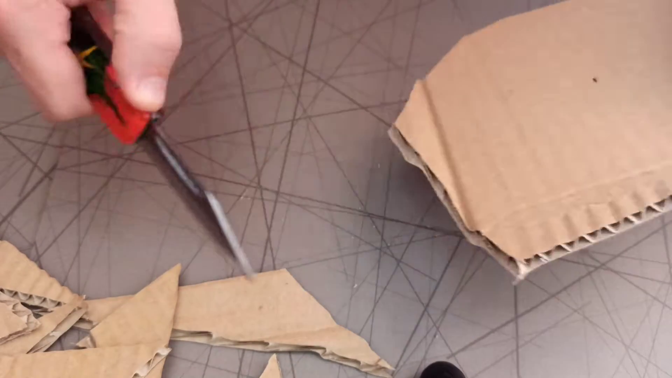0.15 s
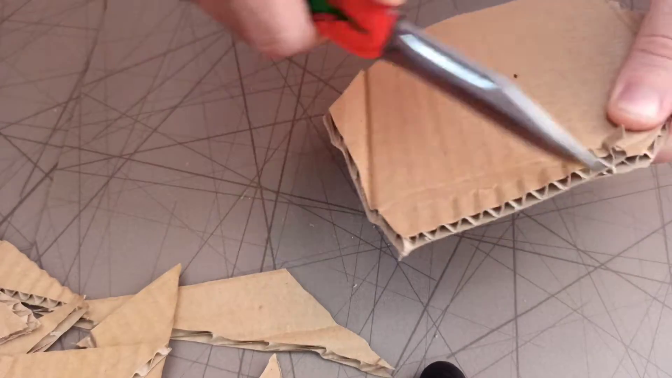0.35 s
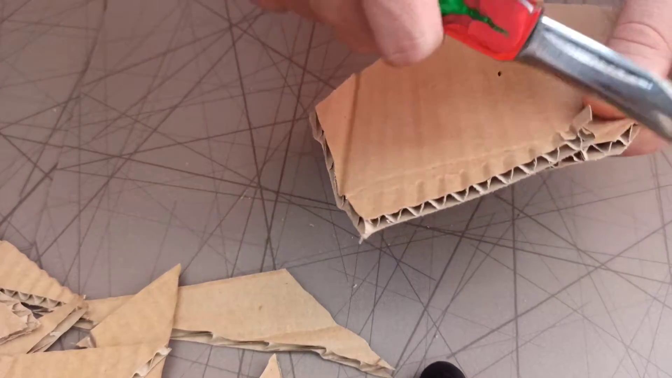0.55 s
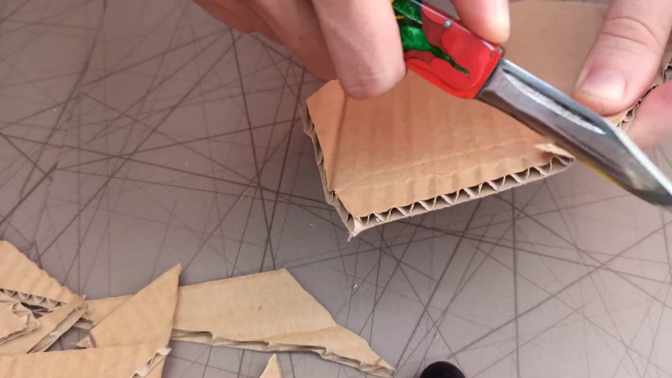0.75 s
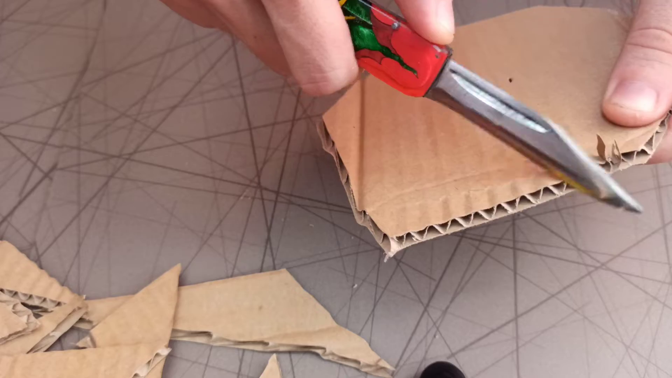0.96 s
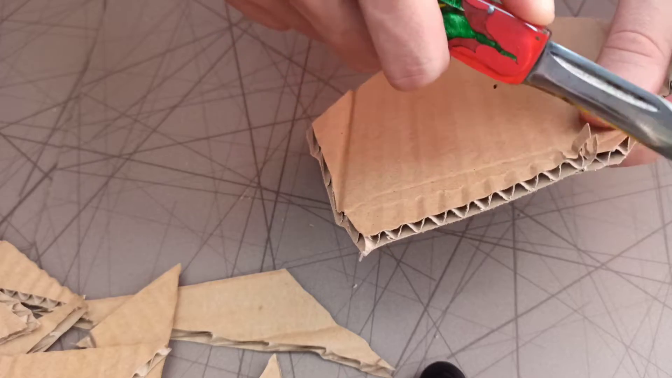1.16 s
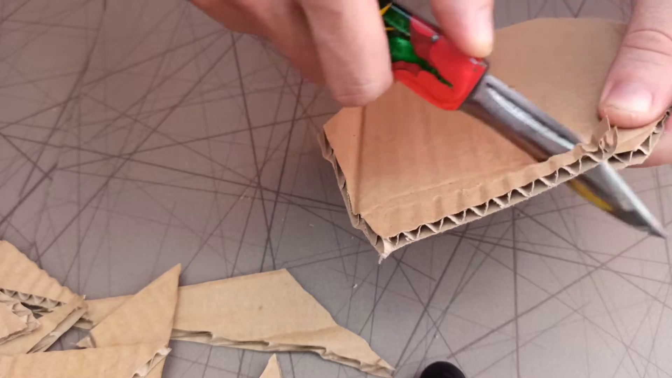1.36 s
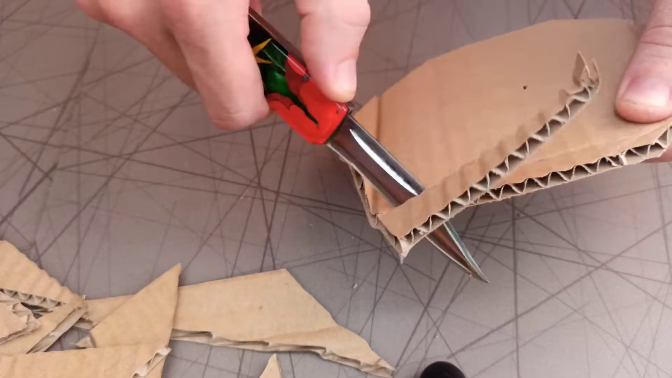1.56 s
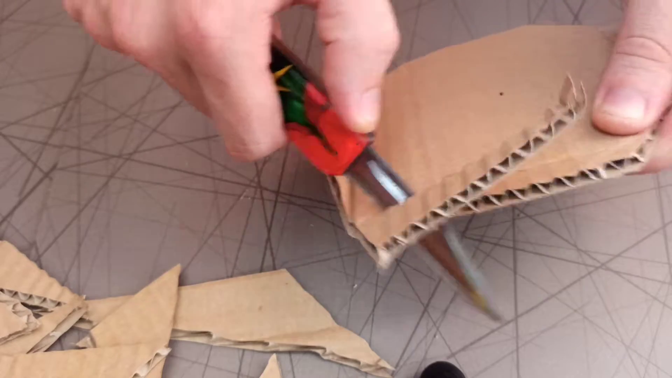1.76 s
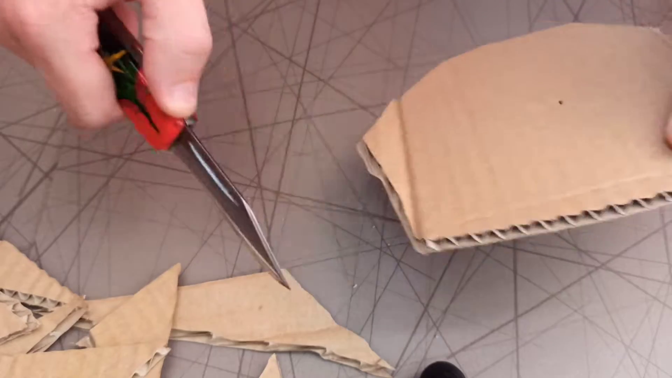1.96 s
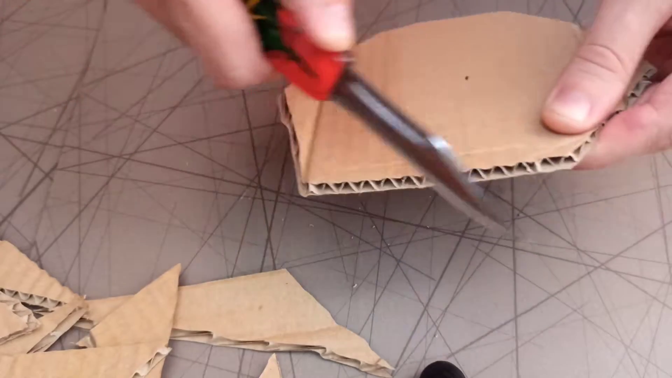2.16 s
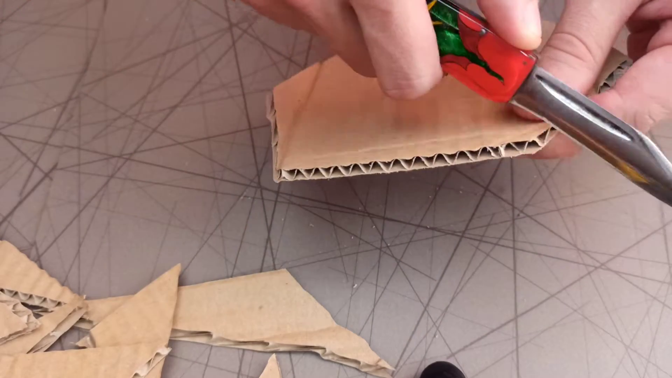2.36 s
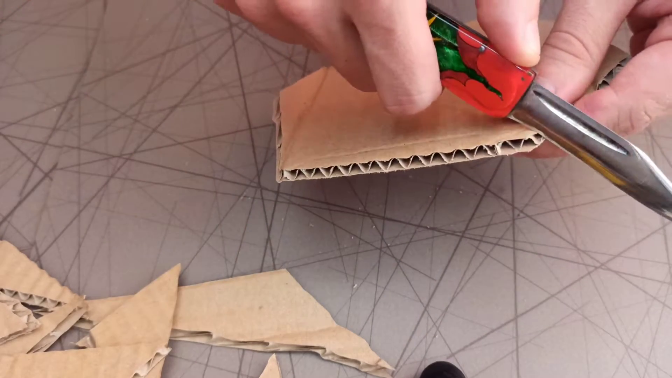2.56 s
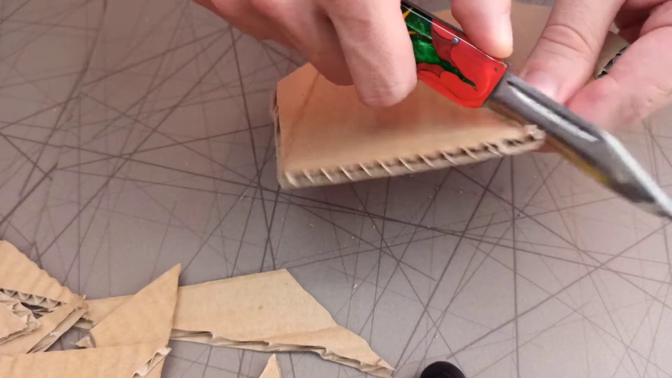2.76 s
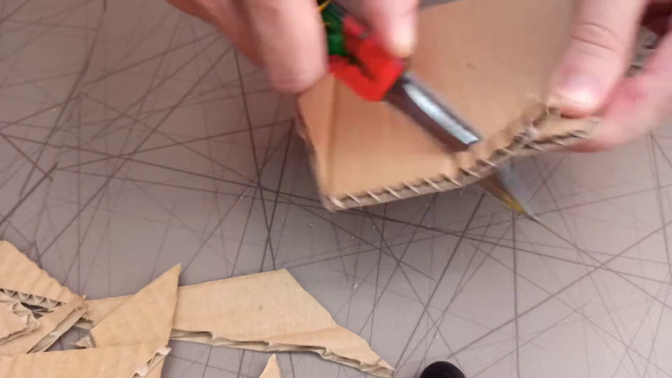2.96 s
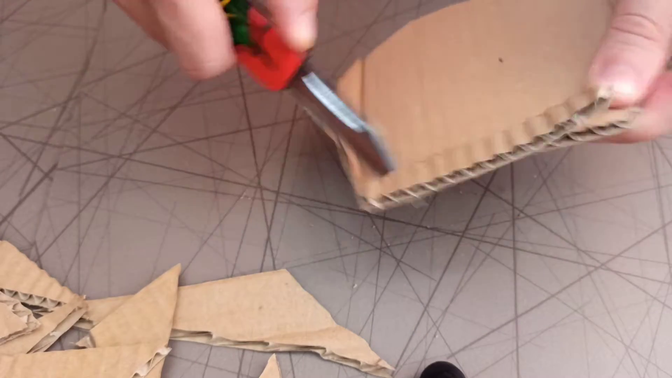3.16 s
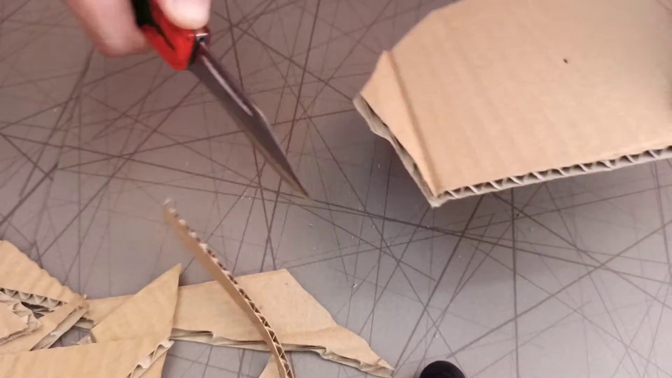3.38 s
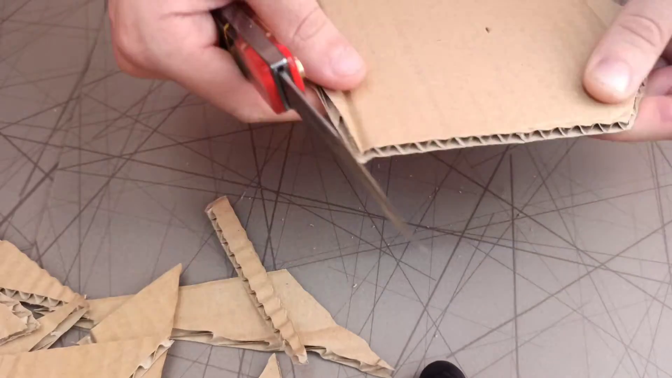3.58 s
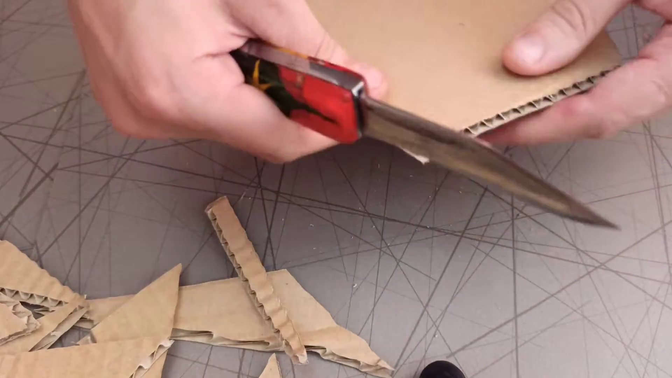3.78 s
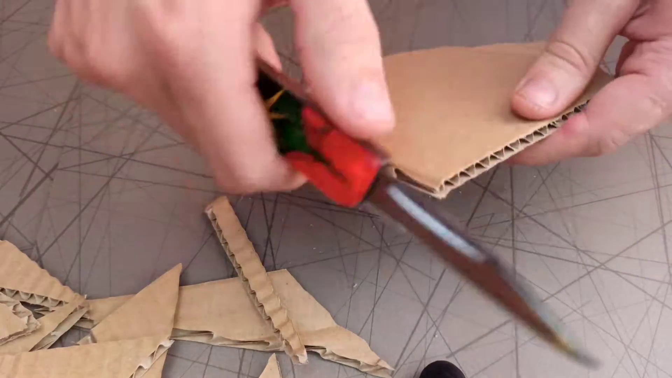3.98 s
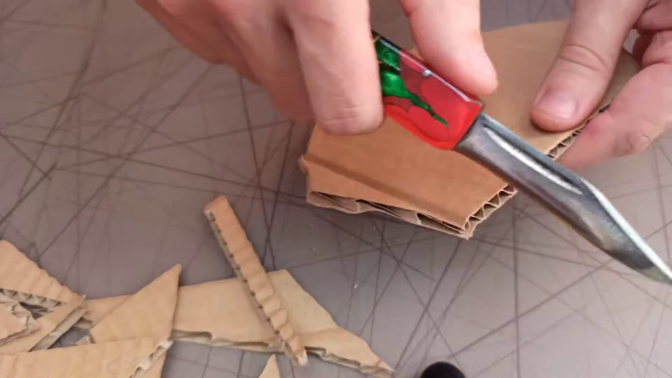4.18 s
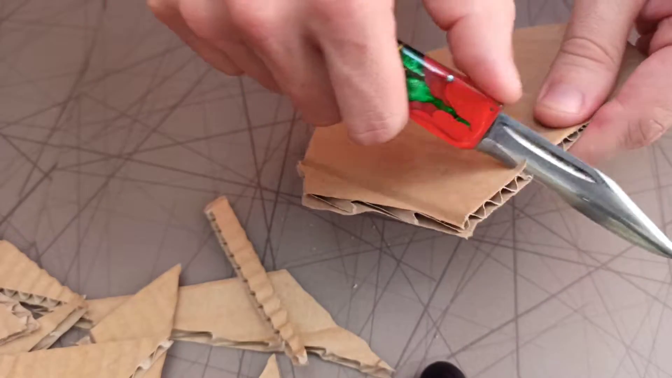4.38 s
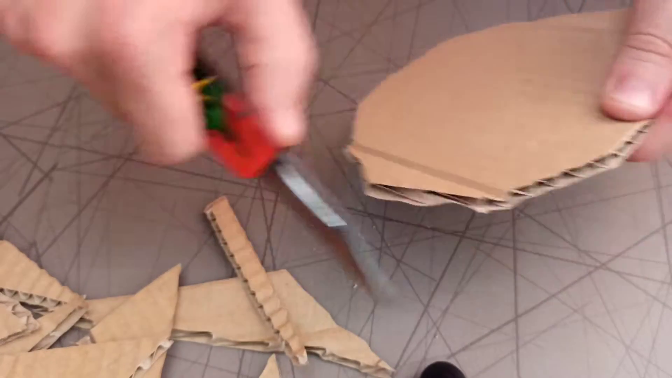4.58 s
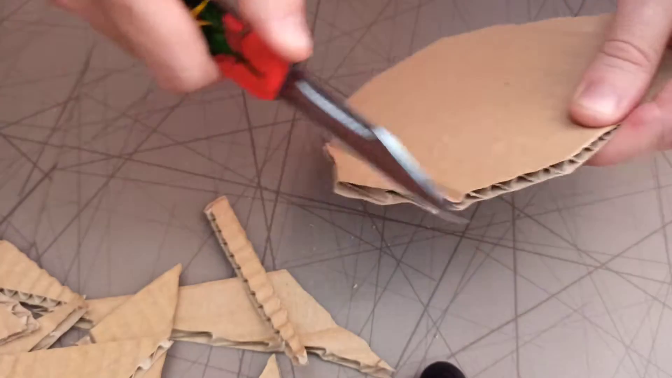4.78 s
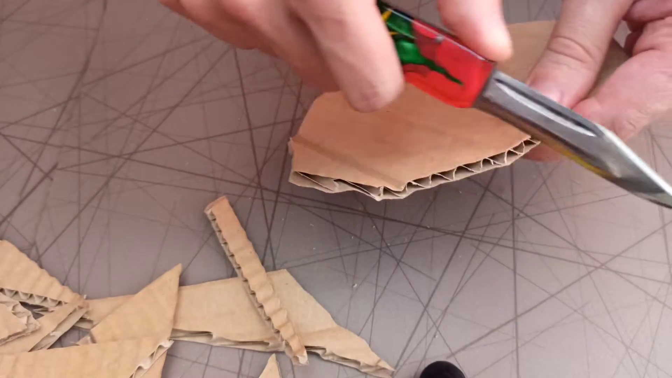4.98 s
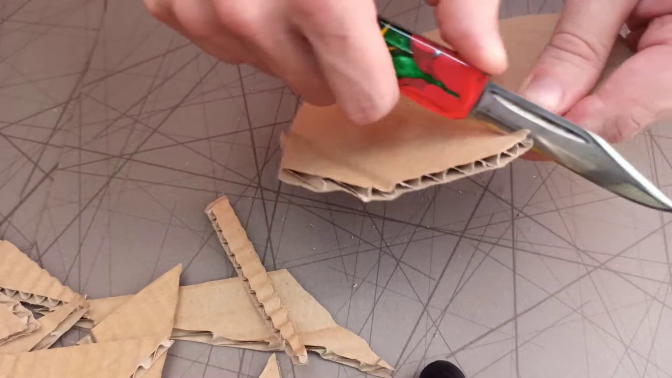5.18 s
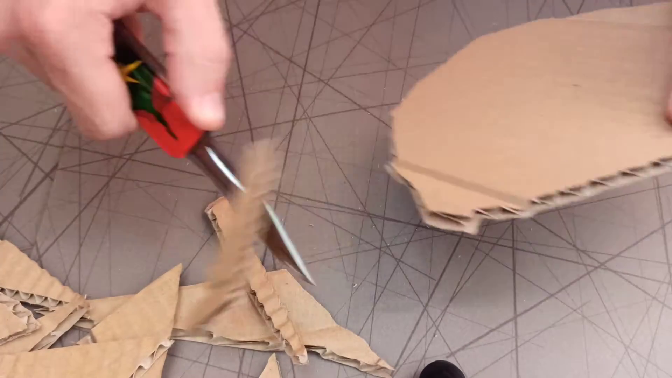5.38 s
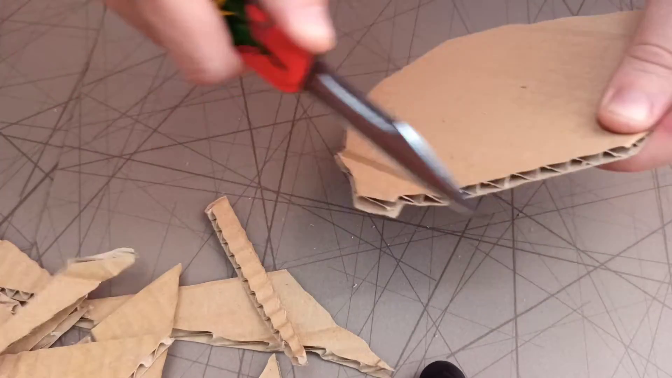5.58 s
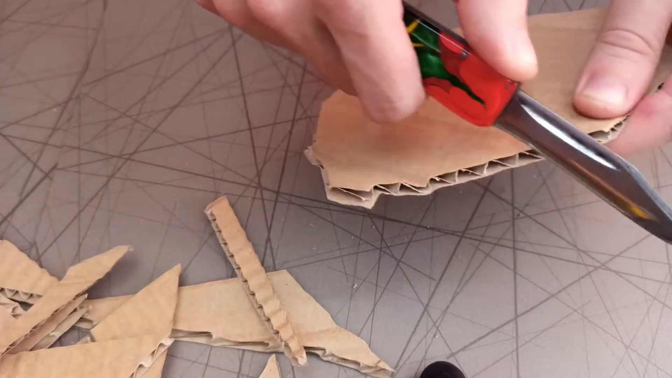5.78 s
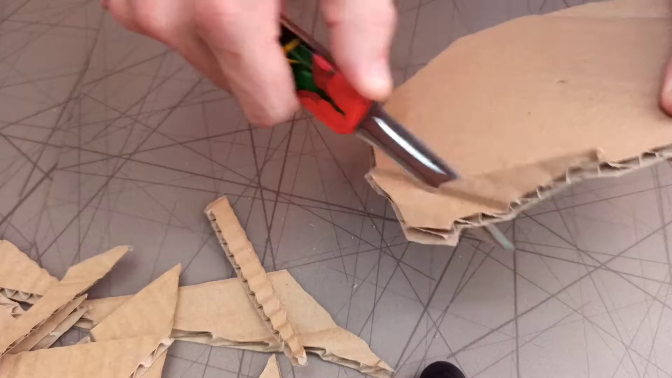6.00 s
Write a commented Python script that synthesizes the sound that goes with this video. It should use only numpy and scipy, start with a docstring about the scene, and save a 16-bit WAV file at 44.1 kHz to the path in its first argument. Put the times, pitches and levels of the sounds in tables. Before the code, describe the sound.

A knife rips through corrugated cardboard in short, dry, raspy strokes with crisp cracks and dull knocks, close by in a small quiet room.

```python
"""Knife through corrugated cardboard

A knife is pushed through the board in short strokes, heard close by.
Tearing is noise in clumps, one per bundle of fibres; snapping flutes are short ringing cracks.
Cuts, rubs and knocks also drive the short modes of the board, which answers dully.
Behind lie the sparse echoes of a small room, rumble and hiss, and a faint hum of two thin tones."""
import sys
import numpy as np
from scipy import signal
from scipy.io import wavfile
from scipy.ndimage import uniform_filter1d

SR = 44100
rng = np.random.default_rng(int(sys.argv[2]) if len(sys.argv) > 2 else 0)


def invert_db(x):
    """Field ratio 10**(x/20) for x, a level in decibels (scalar or array-like)."""
    u = np.asarray(x, float) / 20
    return 10 ** u


def pcm_store(signal):
    """Save signal as 16-bit PCM."""
    levels = np.round(np.clip(np.atleast_2d(signal), -1, 1) * 32767)
    wavfile.write(sys.argv[1], SR, levels.astype(np.int16).T)


N = 266364  # length in samples


def evened(x):
    """Scales to an rms of one."""
    return x / np.sqrt(np.mean(x ** 2) + 1e-20)


def read_curve(points, hz):
    """Reads a table over frequency on a log-frequency axis."""
    table_hz, value = np.transpose(points)
    return np.interp(np.log(hz + 1), np.log(table_hz + 1), value)


def coloured(x, points):
    """Causal filter with the given spectrum: the phase follows from the log gain."""
    hz = abs(np.fft.fftfreq(8192, 1 / SR))
    log_gain = np.log(invert_db(read_curve(points, hz)))
    minimum_phase = np.exp(np.conj(signal.hilbert(log_gain)))
    taps = np.fft.ifft(minimum_phase).real[:4096]
    return signal.oaconvolve(x, taps)[:N]


# spectrum of the room air, relative: (pitch_hz, level_db)
AIR_COLOUR = [(50, 3.5), (110, 7), (250, -2.5), (600, -10), (1200, -18), (2200, -27.5), (5000, -34),
              (16000, -37.5)]
AIR_DB = -58.5  # rms level of the air ahead of the overall tone
# two thin hum tones: (level_db, waver_width_hz)
HUM_TONES = [(-70, 3.4), (-90.5, 20)]
# their pitches: (pitch_hz)
HUM_PITCHES = [623, 4362]


def air():
    """Low rumble and hiss as coloured noise, with two thin tones that waver slightly."""
    t = np.arange(N) / SR
    out = invert_db(AIR_DB) * evened(coloured(rng.standard_normal(N), AIR_COLOUR))
    for pitch_hz, (level_db, width_hz) in zip(HUM_PITCHES, HUM_TONES):
        keep = np.exp(-np.pi * width_hz / SR)
        noise = rng.standard_normal(N) + 1j * rng.standard_normal(N)
        drift = signal.lfilter([1], [1, -keep], noise)
        waver = 1 + 0.15 * drift / abs(drift).std()
        tone = (waver * np.exp(2j * np.pi * pitch_hz * t)).real
        out += invert_db(level_db) * evened(tone)
    return out


# how fast the echoes die by 60 dB: (pitch_hz, t60_s)
ROOM_DECAY = [(200, 0.21), (600, 0.19), (1500, 0.2), (4000, 0.2), (10000, 0.2)]


def room(x):
    """Sparse echoes of random sign, each band dying at its own speed."""
    taps = np.zeros(SR // 2)
    at = np.arange(120, len(taps) - 20, 20)  # one echo at random in each 20 samples
    taps[at + rng.integers(0, 20, len(at))] = rng.choice([-1., 1.], len(at))
    hz, t, z = signal.stft(taps, SR, nperseg=256)
    decay = invert_db(-60 * t / read_curve(ROOM_DECAY, hz)[:, None])
    tail = signal.istft(z * decay, SR, nperseg=256)[1]
    return signal.fftconvolve(x, tail / np.linalg.norm(tail))[:N]


# ringing modes of the cardboard, levels relative: (pitch_hz, width_hz, level_db)
BOARD_MODES = [(406, 30, 0), (467, 40, 2), (620, 19, 0.5), (709, 110, 7.5), (988, 84, 2), (1185, 130, 2),
               (1378, 200, 2), (1600, 68, -9.5), (2120, 89, -5.5)]


def board(force):
    """Every push on the cardboard rings the same short modes; a thin sheet radiates little bass."""
    t = np.arange(SR // 8) / SR
    ring = np.zeros(len(t))
    for pitch_hz, width_hz, level_db in BOARD_MODES:
        decay = np.sqrt(width_hz) * np.exp(-np.pi * width_hz * t)
        ring += invert_db(level_db) * decay * np.sin(2 * np.pi * pitch_hz * t)
    thin_sheet = signal.butter(3, 300., "high", fs=SR, output="sos")
    ring = signal.sosfilt(thin_sheet, ring)
    return signal.oaconvolve(force, ring / np.linalg.norm(ring))[:N]


# blows on the board, levels relative: (start_s, level_db, pitch_hz, cycles)
BLOWS = [(.0455, -12.5, 650, 4.2), (.046, -18, 379, 8.1), (.058, -23.5, 624, 3.7), (.603, -43.5, 463, 3.3),
         (0.714, -30, 1220, 6.3), (.759, -15.5, 700, 3.2), (0.776, -20, 970, 2.2), (.824, -25, 540, 5.3),
         (.98, -40, 1400, 3), (.987, -32, 756, 3.3), (1.055, -35, 1300, 1.7), (1.055, -29, 485, 7.5),
         (1.305, -51, 704, 4.4), (1.39, -48, 750, 4.4), (1.412, -42, 446, 8.1), (1.43, -35.5, 484, 5),
         (1.453, -40.5, 434, 8), (1.602, -35, 1520, 3.8), (1.626, -28, 510, 1.7), (1.632, -34.5, 430, 7.8),
         (1.657, -28.5, 1020, 2.5), (1.708, -43, 1000, 2), (1.736, -34, 440, 6.8), (1.765, -27.5, 450, 2),
         (1.811, -36, 580, 5), (1.932, -33, 740, 1.25), (2.645, -40, 573, 9.8), (2.788, -26.5, 690, 3.5),
         (2.941, -14.5, 1190, 5.2), (3.111, -29, 510, 2), (3.143, -17.5, 625, 2.4), (3.166, -18, 620, 2.1),
         (3.352, -30.5, 1700, 2.4), (3.516, -37.5, 443, 4), (3.822, -23.5, 785, 4.9),
         (3.86, -36, 990, 12.4), (4.032, -20.5, 620, 1.6), (4.039, -25, 217, 4.4), (4.072, -28, 1500, 2),
         (4.381, -32.5, 1370, 11.8), (4.513, -24.5, 430, 7.3), (4.538, -24.5, 656, 2.5),
         (5.303, -10, 600, 3), (5.376, -39, 794, 4.3), (5.814, -32.5, 737, 8.7), (5.816, -28.5, 1530, 12),
         (5.91, -22, 1340, 2.6), (5.946, -24, 730, 7.2), (5.973, -18, 1080, 4.2)]


def knocks():
    """A push of a few cycles, heard directly and through the ringing board."""
    push = np.zeros(N + 2000)
    for start_s, level_db, pitch_hz, cycles in BLOWS:
        u = np.arange(0, 1, pitch_hz / (np.clip(cycles, 1, 12) * SR))  # 0 to 1 along the push
        early_peak = np.sin(np.pi * u ** 0.3) ** 2
        push[round(start_s * SR):][:len(u)] += invert_db(level_db) * np.sin(2 * np.pi * cycles * u) * early_peak
    return invert_db(-7.0) * push[:N] + invert_db(-23.0) * board(push)


# spectrum of tearing fibres ahead of the overall tone: (pitch_hz, level_db)
FIBRE_COLOUR = [(150, -30), (500, 1), (1500, -3.5), (3000, -5.5), (7000, -1.5), (16000, -1.5)]


def fibre_colour(x):
    """Gives noise the spectrum of tearing cardboard fibres."""
    return coloured(x, FIBRE_COLOUR)


# flutes snapping, blade and scraps ticking; level relative, ring against the crack:
# (start_s, level_db, ring_hz, ring_db, length_ms)
CRACKS = [(0.0251, -14, 4070, 10, 1.5), (0.0456, -9.5, 1600, 14, 3), (0.602, -51, 1600, 5, 1.7),
          (0.711, -30, 1500, 25, 0.87), (0.726, -38, 2930, 23, 1.7), (0.739, -27, 1500, 5, 1.7),
          (0.7593, -18.5, 1600, 20.5, 2.9), (0.7734, -29, 4300, 22, 2.5), (0.8244, -29, 3590, 13, 2.3),
          (0.979, -38, 1590, 5, 1.9), (1.0027, -37.5, 2630, 13, 2.1), (1.0332, -42, 2290, 26, 2.1),
          (1.0565, -31, 1600, 5, 1.3), (1.569, -32.5, 4150, -11, 1.9), (1.6247, -43, 2210, 2.5, 1),
          (1.7792, -30, 3570, 10, 0.99), (1.7848, -20.5, 4700, -5.5, 2), (1.932, -37.5, 3540, 20.5, 4),
          (1.9485, -31.5, 3470, 21, 1.4), (2.007, -48, 3300, 5, 1.7), (2.0444, -40, 2060, 3, 1.7),
          (2.1102, -19.5, 3700, 10, 1.46), (2.4094, -44, 2100, 2, 1.1), (2.6453, -21.5, 4770, 17, 0.73),
          (2.741, -15.5, 4300, -13, 2.3), (2.768, -17, 4300, 12, 2.1), (2.7874, -12, 4730, 14.5, 1.8),
          (2.9111, -6.5, 4340, 3, 1.3), (2.9404, -9, 4660, 10.5, 1.2), (2.9507, -2.5, 4100, 6, 2.1),
          (3.1091, -6, 4340, -3, 2.8), (3.1354, -5.5, 2140, 4, 5.1), (3.1446, -5, 2090, 7, 3.7),
          (3.1564, -4, 2190, 5, 0.66), (3.1695, -11, 1880, 7, 0.68), (3.3069, -37, 1590, -1, 2.3),
          (3.3438, -24.5, 4000, 11.5, 3), (3.3509, -30.5, 4500, 17, 2.4), (3.406, -38, 3960, 14, 3.2),
          (3.4725, -33, 4030, 1, 1.7), (3.512, -40, 1650, 8, 1.9), (3.5592, -31.5, 4680, 5, 2.8),
          (3.5795, -39.5, 4260, 5, 2.1), (3.776, -36, 3400, 4, 5), (3.822, -26.5, 4250, 9, 3.6),
          (3.9494, -36, 4540, 6, 2.4), (4.0334, -10, 3900, 14.5, 2.35), (4.071, -33.5, 4060, 24.5, 1.3),
          (4.2972, -39.5, 1720, 15, 1.7), (4.3839, -23, 4130, 2.5, 1.7), (4.4795, -15.5, 3220, -3, 1.7),
          (4.5082, -5, 1530, 8, 1.5), (4.5388, -5.5, 3920, 5, 4.4), (4.5982, -19.5, 3900, 1.5, 2.9),
          (4.695, -34.5, 3930, -5, 1.5), (4.8336, -25, 2400, 0, 0.97), (4.8427, -29, 2360, 17.5, 2.5),
          (4.8743, -26.5, 3400, 6, 1.7), (4.9004, -38, 4000, 2, 1.7), (4.911, -36.5, 4600, -8, 2.6),
          (4.998, -40, 4360, -3, 1.5), (5.052, -45, 4340, 3, 1.7), (5.111, -35, 4250, 4, 1.7),
          (5.1187, -26.5, 3620, -4, 2.4), (5.218, -22, 1930, 8.5, 1.5), (5.235, -7.5, 4680, 4, 1.7),
          (5.2447, -10, 3780, 5, 1.7), (5.2643, -4.5, 3250, 7, 3), (5.2801, -10, 4290, 3, 2.1),
          (5.2957, -15.5, 3230, 11.5, 3.8), (5.3006, -3, 3230, 9, 1.9), (5.375, -28.5, 4740, 2.5, 2.4),
          (5.4091, -24, 4160, 6.5, 3.1), (5.4949, -47, 4500, 4.5, 1.7), (5.5389, -35.5, 3830, 16, 2.3),
          (5.8127, -32.5, 1630, 19, 3.7), (5.8351, -24, 1610, 1, 1.6), (5.9434, -11, 2890, 16, 2),
          (5.9661, -11, 3620, 16, 2)]


def snaps():
    """Short cracks of noise, each with the brief ring of the flute or blade edge that let go."""
    t, out = np.arange(1300) / SR, np.zeros(N + 1300)
    grit = rng.standard_normal((len(CRACKS), len(t)))
    for (start_s, level_db, ring_hz, ring_db, length_ms), noise in zip(CRACKS, grit):
        u = 1000 * t / np.clip(length_ms, 0.3, 8)
        shape = (1 - np.exp(-2.5 * u)) ** 2 * np.exp(-u)
        # each crack carries the energy of its envelope, whatever the noise drawn
        crack = shape * noise * np.linalg.norm(shape) / np.linalg.norm(shape * noise)
        ring = signal.lfilter(*signal.iirpeak(ring_hz, 3, SR), crack)
        out[round(start_s * SR):][:len(t)] += invert_db(level_db) * (crack + invert_db(ring_db) * ring)
    return invert_db(-9.5) * fibre_colour(out)


# blade cutting, it swells, holds and stops dead; levels relative:
# (start_s, swell_s, hold_s, tearing_db, drumming_db)
CUT_STROKES = [(0.022, 0.0066, 0.016, -27.5, -28), (1.75, 0.03, 0.017, -26, -41.5),
               (2.644, 0.0037, 0.0046, -35, -56), (2.712, 0.057, 0.036, -28.5, -37.5),
               (2.907, 0.0038, 0.079, -26, -29.5), (3.1, 0.014, 0.062, -28, -30.5),
               (4.311, 0.042, 0.038, -39.5, -45.5), (4.451, 0.028, 0.045, -23, -33),
               (4.525, 0.011, 0.0095, -19, -28), (5.096, 0.024, 0.028, -38.5, -42.5),
               (5.207, .018, 0.088, -21.5, -33), (5.879, 0.0053, 0.043, -28.5, -34.5),
               (5.896, 0.028, 0.077, -22.5, -36)]
# blade and fingers rubbing the board, fading out; levels relative:
# (start_s, hold_s, fade_s, tearing_db, drumming_db)
RUB_STROKES = [(.0, 0.031, 0.012, -39.5, -46), (0.594, 0.036, 0.087, -65, -62.5),
               (0.704, 0.077, 0.026, -51, -48.5), (0.803, 0.01, 0.11, -42.5, -44),
               (0.931, 0.11, .03, -62, -59), (1.037, 0.011, .02, -49, -43.5),
               (1.276, 0.062, 0.022, -55, -53), (1.341, 0.073, .02, -62, -56), (1.42, 0.11, .015, -57, -62),
               (1.56, 0.064, 0.092, -48.5, -49), (1.698, 0.041, 0.014, -55.5, -51.5),
               (1.786, 0.014, 0.048, -57.5, -66), (1.926, 0.0051, 0.22, -51.5, -60),
               (2.102, .01, 0.3, -68.5, -69), (2.601, 0.028, .01, -50.5, -70),
               (2.634, 0.0079, 0.1, -46, -59), (3.167, 0.022, 0.059, -40, -42),
               (3.339, 0.0044, 0.044, -44.5, -48.5), (3.376, 0.11, .02, -66, -75),
               (3.504, .11, 0.074, -51.5, -56), (3.81, 0.0057, 0.015, -38, -39),
               (3.837, 0.11, 0.062, -52, -61), (4.019, 0.015, 0.017, -38, -27),
               (4.04, .015, 0.038, -65, -52.5), (4.56, 0.016, 0.036, -63, -55),
               (4.828, .08, 0.038, -69.5, -69), (4.989, 0.011, 0.018, -57, -77),
               (5.148, 0.0063, 0.027, -51.5, -57), (5.408, 0.007, 0.27, -58, -75),
               (5.526, 0.019, 0.08, -46.5, -65), (5.818, 0.14, 0.0093, -44.5, -51.5),
               (5.999, 0.013, 0.036, -32, -39)]
SWELL_DB, STOP_S = 29, 0.012  # range of a cut's swell and stop, time of the stop
FADE_DB, TOUCH_S = 26.5, 0.0098  # range of a rub's touch and fade, time of the touch
WAVER_DB, WAVER_S = 3.0, 0.02  # the hand presses unevenly: rms swing, smoothing window


def stroke_gain(start_s, lengths_s, range_db, levels_db):
    """Pressure rises, holds and falls in straight decibel lines, silent outside the stroke."""
    t = np.arange(N) / SR
    corners_s = np.cumsum([0, *lengths_s])
    shape_db = np.interp(t - start_s, corners_s, [-range_db, 0, 0, -range_db], -200, -200)
    return invert_db(shape_db + np.array(levels_db)[:, None])


def pressure():
    """Levels of tearing and drumming over time: cuts and rubs each follow one shape; light rubs waver."""
    cuts, rubs = np.zeros((2, N)), np.zeros((2, N))
    for start_s, swell_s, hold_s, *levels_db in CUT_STROKES:
        cuts += stroke_gain(start_s, (swell_s, hold_s, STOP_S), SWELL_DB, levels_db)
    for start_s, hold_s, fade_s, *levels_db in RUB_STROKES:
        rubs += stroke_gain(start_s, (TOUCH_S, hold_s, fade_s), FADE_DB, levels_db)
    waver = rng.standard_normal((2, N))
    for _ in range(2):
        waver = uniform_filter1d(waver, round(WAVER_S * SR), axis=1)
    return cuts + rubs * invert_db(WAVER_DB * evened(waver))


def clumps(per_s, spread_db, length_ms, smooth):
    """Noise in bursts: each bundle of fibres lets go at once and dies fast, over an even scrape."""
    size = invert_db(spread_db * np.minimum(rng.exponential(1, N), 2.5))
    releases = size * (rng.random(N) < per_s / SR)
    bursts = signal.lfilter([1], [1, -np.exp(-1000 / (length_ms * SR))], releases)
    return evened((smooth + evened(bursts)) * rng.standard_normal(N))


PATCH_DB = 4.0  # rms swing of the colour as flutes pass under the blade


def patchy(x):
    """Narrow resonances come and go as the blade crosses flutes."""
    z = signal.stft(x, nperseg=512, noverlap=384)[2]
    field = uniform_filter1d(rng.standard_normal(z.shape), size=3, axis=0)  # over frequency
    field = uniform_filter1d(field, size=10, axis=1)  # over time
    varied = z * invert_db(PATCH_DB * evened(field))
    return evened(signal.istft(varied, nperseg=512, noverlap=384)[1][:N])


def strokes():
    """The blade tears fibres, each bundle with a colour of its own, and shakes the board."""
    torn = 1.82 * clumps(per_s=450, spread_db=2.9, length_ms=0.62, smooth=1.0)
    for hz in np.geomspace(700, 13000, num=10):
        band = signal.butter(1, [hz / 1.2, hz * 1.2], "band", fs=SR, output="sos")
        torn += 1.2 * signal.sosfilt(band, clumps(per_s=70, spread_db=5, length_ms=2.5, smooth=0.3))
    tearing, drumming = pressure()
    rasp = fibre_colour(tearing * patchy(torn))
    slips = clumps(per_s=350, spread_db=4, length_ms=1.2, smooth=0.55)
    return invert_db(-4.0) * rasp + invert_db(-3.0) * board(drumming * patchy(slips))


def scene():
    """Knife and board close by, their echo, and the room air."""
    near = strokes() + snaps() + knocks()
    return (near + invert_db(-10.5) * room(near) + air())[None]


# overall tone: weak bass, strong treble with steps, a steep drop above 15.7 kHz: (pitch_hz, level_db)
OVERALL_TONE = [(35, -21), (55, -5), (2500, 3.5), (4650, 7), (4850, -2), (6000, 4), (6250, 12.5),
                (7500, 14), (8400, 10.5), (8600, -1.5), (11400, -15.5), (11700, 4.5), (15700, 3),
                (15850, -29.5), (16900, -52.5)]


def overall_tone(x):
    """Colours the whole sound: weak bass, strong stepped treble, almost nothing at the very top."""
    return coloured(x, OVERALL_TONE)


def band_limit(x):
    """A steep low-pass at the top of the band."""
    return signal.sosfilt(signal.butter(12, 16970, fs=SR, output="sos"), x)


def record(dry):
    """Gives the scene its overall tone and finishes the mix."""
    mix = overall_tone(dry[0])[None]
    return band_limit(mix)


dry = scene()
out = record(dry)
pcm_store(out)
```